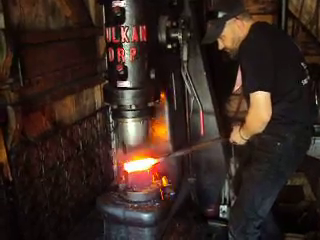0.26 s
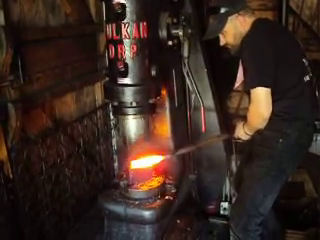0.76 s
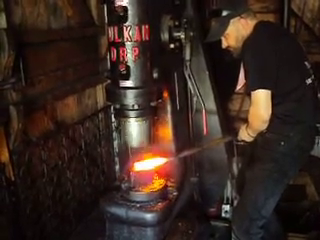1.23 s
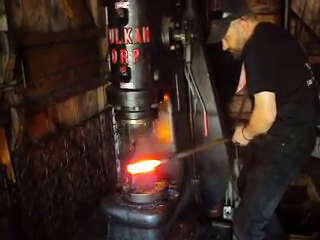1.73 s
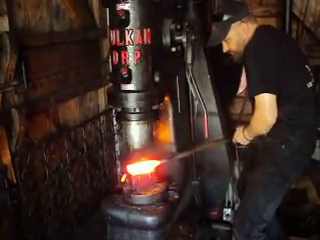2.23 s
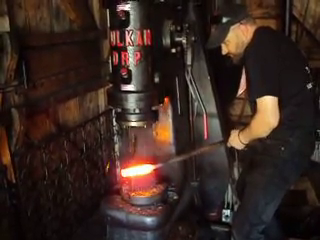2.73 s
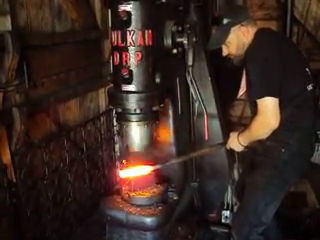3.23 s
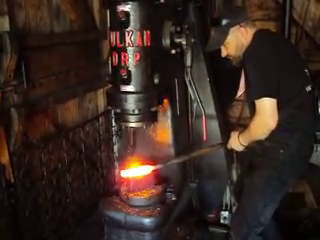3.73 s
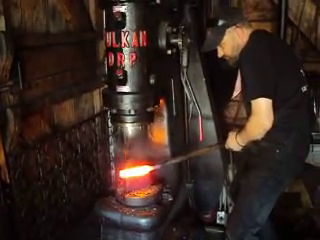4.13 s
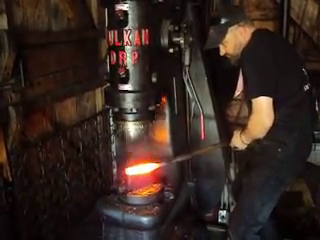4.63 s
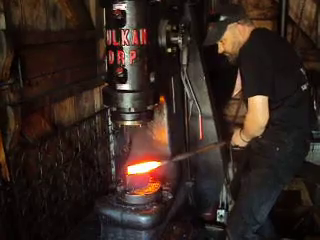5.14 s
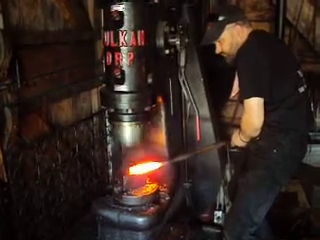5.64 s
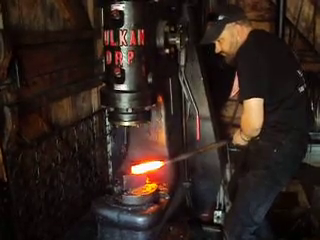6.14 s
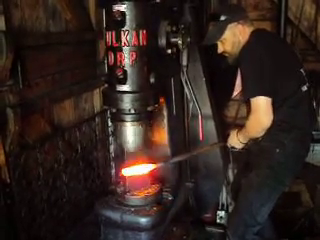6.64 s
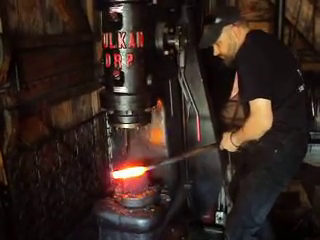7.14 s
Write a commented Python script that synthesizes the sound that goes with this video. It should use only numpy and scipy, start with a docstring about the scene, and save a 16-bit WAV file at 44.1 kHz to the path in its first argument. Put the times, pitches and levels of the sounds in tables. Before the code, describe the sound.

A pneumatic forging hammer pounds a hot steel bar about three times a second, without a break. Each blow cracks and clanks over a heavy thud, the machine's frame rings, and the bar and tongs rattle. Between blows, air rushes faintly and valves clack. A few sharp clicks come as the bar slaps the die. A motor hums underneath, the small workshop booms, and the hardest hits distort slightly.

```python
"""A motor hums in a small workshop while a pneumatic forging hammer pounds hot steel three times a second.
Each blow opens with a shove of air from the falling ram. The dies crack and clank, the ram knocks,
the anvil thuds and the frame rings. The room echoes and booms as tongs and bar rattle, then air rushes
in and the valves clack twice before the next blow. Now and then the bar slaps back onto the die.
The hardest blows saturate and clip."""
import sys
import numpy as np
from scipy import signal
from scipy.fft import rfft, irfft
from scipy.io import wavfile

SR = 44100
rng = np.random.default_rng(int(sys.argv[2]) if len(sys.argv) > 2 else 0)


def master_out(mix):
    """Clip the mix to full scale and print it as 16-bit PCM to the path in sys.argv[1]."""
    frames = np.transpose(np.atleast_2d(mix))
    ceiling = np.clip(frames, -1, 1)
    pcm = np.round(ceiling * 32767).astype(np.int16)
    wavfile.write(sys.argv[1], SR, pcm)


N = 325458


def amp(db):
    """Decibels to gain."""
    return 10 ** (np.asarray(db) / 20)


def unit(x):
    """Scales to rms 1."""
    return x / np.sqrt(np.mean(x ** 2) + 1e-20)


def curve_at(points, hz):
    """Reads a curve on a logarithmic frequency axis."""
    f, value = np.transpose(points)
    return np.interp(np.log(hz + 1), np.log(f + 1), value)


def add(mix, s, sound):
    """Mixes a sound in at s seconds."""
    start = round(s * SR)
    sound = sound[max(-start, 0):]
    part = mix[max(start, 0):][:len(sound)]
    part += sound[:len(part)]


def noise(eq, size=SR):
    """Noise of rms 1, coloured by an EQ curve."""
    hz = np.arange(size // 2 + 1) * SR / size
    return unit(irfft(rfft(rng.standard_normal(size)) * amp(curve_at(eq, hz)), size))


def ring(modes, t, scatter_db):
    """Sines that swell and die, each struck a little harder or softer every time."""
    hz, db, t60, attack_s = np.transpose(modes)[:, :, None]
    db = db + scatter_db * rng.standard_normal(db.shape)
    since_peak = t - attack_s
    rise = np.sin(np.pi / 2 * np.minimum(t / attack_s, 1)) ** 2
    fall = np.exp(-np.log(1000) * np.maximum(since_peak, 0) / t60)
    return (amp(db) * rise * fall * np.sin(2 * np.pi * hz * since_peak)).sum(0)


def blend(common, fresh, share):
    """Equal-power mix of what all blows have in common with what is new in this one."""
    return np.sqrt(share) * common + np.sqrt(1 - share) * fresh


# EQ of the machine's rumble: f/Hz, level/dB
RUMBLE_EQ = [(20, -21.5), (50, 10), (110, -6.5), (200, 7), (400, -9), (700, 2.5), (1300, -4.5),
             (2200, -21.5), (4000, -19), (5500, -42.5)]
# tones of the running machine: f/Hz, rms level/dB
HUM_TONES = [(100, -48), (194, -49.5), (538, -59.5), (684, -50.5), (2083, -63.5)]
def motor(rumble_db=-39, waver_cycles=0.52):
    """Motor and compressor lay a steady bed of rumble with a few wavering tones."""
    out, t = amp(rumble_db) * noise(RUMBLE_EQ, size=N), np.arange(N) / SR
    knots = np.linspace(0, t[-1], 60)
    for hz, db in HUM_TONES:
        drift = np.interp(t, knots, rng.standard_normal(len(knots)))
        out += np.sqrt(2) * amp(db) * np.sin(2 * np.pi * (hz * t + waver_cycles * drift))
    return out


# cue list of hammer blows: t/s, force/dB, hardness/dB, rattle level/dB
BLOWS = [(-.078, 0.5, -11, 10.5), (0.2578, -1, 0, 2), (0.5934, 1, -3, 5), (0.9322, 4.5, 0, 6),
         (1.2705, -0.5, 15, -12.5), (1.6124, 2.5, -8, 3), (1.9495, 0.5, 6, 0), (2.2900, 2.5, 6, 6.5),
         (2.6284, 1.5, 8, -1.5), (2.9682, 2, 3, 4), (3.3094, -1, 8.5, 5), (3.6486, -0.5, 7, 9.5),
         (3.9894, 2.5, 6.5, 10.5), (4.3059, 2, 17, 9), (4.6456, 1, 8.5, 9), (4.9925, -1.5, 8, 6.5),
         (5.336, -1.5, 4.5, 4), (5.6695, -1.5, 4, 2.5), (6.009, 0.5, -9, -6), (6.3504, -1, 5, 5),
         (6.6946, -2, -1.5, -20), (7.0345, -2, 1.5, -6.5), (7.366, -2.5, 2, -6)]
# EQ of moving air: f/Hz, level/dB
AIR_EQ = [(100, -1), (600, -9), (1300, 3), (2200, -0.5), (3400, -6.5), (4200, -9.5), (5200, -20.5),
          (6500, -29.5)]
def air_shove(push_db=-16, push_hz=100, puff_db=-37, lead_s=0.0105):
    """The falling ram shoves air and frame just before it lands."""
    out, t = np.zeros(N), np.arange(SR) / SR
    for s, force_db, *_ in BLOWS:
        shove = amp(puff_db) * noise(AIR_EQ) - amp(push_db) * np.sin(2 * np.pi * push_hz * t)
        add(out, s - lead_s, amp(force_db) * shove * np.exp(-t / 0.0015))
    return out


# EQ of the crack: f/Hz, level/dB
CRACK_EQ = [(40, -3.5), (120, 1.5), (250, 11), (350, -3.5), (700, 4), (1300, -1), (2000, -9), (2800, -8.5),
            (4200, -14.5), (5200, -22), (6500, -36.5)]
# clanking modes of the dies: f/Hz, level/dB, t60/s, attack/s
DIE_MODES = [(233, -22.5, 0.05, 0.0026), (470, -22, .06, 0.00502), (720, -17.5, 0.028, .003),
             (1554, -32, .09, 0.00062), (1940, -35, 0.075, 0.0011), (2050, -39, 0.28, 0.00087),
             (2150, -37, 0.2, 0.00091), (2430, -31.5, .08, 0.0013), (2560, -29, 0.036, .001),
             (2673, -28, 0.049, .001), (2780, -29.5, 0.061, .001), (2913, -32, 0.029, 0.0009),
             (3270, -45, 0.062, .001), (4050, -42, 0.18, .001)]
def dies(crack_db=-15, crack_s=0.012, clank_db=-2):
    """The dies strike with a crack and a clank, louder the harder the blow."""
    out, t = np.zeros(N), np.arange(SR) / SR
    common_crack = noise(CRACK_EQ)
    snap = (1 - np.exp(-t / 0.00027)) * np.exp(-t / crack_s)
    for s, _, hard_db, _ in BLOWS:
        crack = amp(crack_db) * snap * blend(common_crack, noise(CRACK_EQ), share=0.36)
        clank = amp(clank_db) * ring(DIE_MODES, t, scatter_db=1.5)
        add(out, s, amp(hard_db) * (crack + clank))
    return out


# slow level ride of the knock as the bar is shifted on the die: t/s, level/dB
KNOCK_RIDE = [(.3, -1), (1.3, 1), (3.3, -1), (3.7, -6.5), (4.8, -7.5), (5.35, -11.5), (5.9, -1), (7.3, 0)]
# modes of the ram: f/Hz, level/dB, t60/s, attack/s
RAM_MODES = [(240, -13, 0.2, 0.004), (445, -16, 0.17, .034), (459.4, -16, 0.28, 0.00786)]
def ram():
    """The ram's knock depends on where the bar lies under it; force and hardness add to it."""
    out, t = np.zeros(N), np.arange(SR) / SR
    for s, force_db, hard_db, _ in BLOWS:
        knock_db = np.interp(s, *np.transpose(KNOCK_RIDE)) + 0.4 * force_db + 0.24 * hard_db
        add(out, s, amp(knock_db) * ring(RAM_MODES, t, scatter_db=1.5))
    return out


# modes of anvil and frame: f/Hz, level/dB, t60/s, attack/s
FRAME_MODES = [(531, -27.5, 0.61, 0.032), (548, -24, 0.91, .03), (691, -16.7, .33, 0.011005),
               (679, -22.5, 0.38, 0.01115), (813, -25.5, 0.56, .032), (834, -18.3, .42, .032),
               (856, -23.5, .3, .032), (1034, -35, 0.25, .005), (1008, -37.5, 0.4, .005),
               (1170, -29, 0.42, .005), (1215, -27, 0.45, .005)]
def anvil(thud_db=-16, thud_hz=90):
    """The anvil block takes the ram's weight with a thud and rings with the frame."""
    out, t = np.zeros(N), np.arange(SR) / SR
    thud = -np.sin(2 * np.pi * thud_hz * t) * np.exp(-t / 0.008)
    for s, force_db, hard_db, _ in BLOWS:
        add(out, s, amp(thud_db + force_db + 0.25 * hard_db) * thud)
        add(out, s, amp(0.6 * force_db) * ring(FRAME_MODES, t, scatter_db=1.1))
    return out


# EQ of the wall reflections: f/Hz, level/dB
REVERB_EQ = [(30, -23.5), (60, -6.5), (200, -5), (380, -2.5), (550, -2), (850, -3), (1250, -5.5),
             (1900, -13), (2900, -16.5), (4000, -25.5), (5200, -31), (6500, -53.5)]
# their decay time: f/Hz, t60/s
REVERB_T60 = [(60, 0.54), (250, 0.9), (600, 0.91), (1200, 0.6), (2500, 0.54), (5500, 0.63)]
def reverb_tail():
    """One second of dense reflections; the low mids hang on longest."""
    hz, t, spectrum = signal.stft(noise(REVERB_EQ), SR, nperseg=512)
    decay = np.exp(-np.log(1000) * t / curve_at(REVERB_T60, hz)[:, None])
    return signal.istft(spectrum * decay, SR, nperseg=512)[1][:SR]


# standing waves of the workshop: f/Hz, level/dB, t60/s, attack/s
ROOM_MODES = [(49.2, -38.5, 0.58, .02), (60.5, -36, 0.8, 0.016), (84, -37.5, 0.23, 0.0053),
              (97.5, -43, 0.2, 0.0026), (131, -26.5, 0.32, .0267), (162.2, -24, .6, 0.0509),
              (170.7, -22, 0.34, 0.0474), (197.1, -15.2, 0.47, .0406), (216.6, -19, 0.25, 0.051),
              (273.4, -34.5, 0.56, 0.0075), (293, -36, 0.19, 0.024), (349.7, -36, 0.69, .07)]
def room(reverb_db=-15, echo_db=-4, echo_s=0.0722):
    """The ram always lands on one spot, so blows share reflections; the boom swells twice."""
    out, t = np.zeros(N), np.arange(SR) / SR
    common_tail = reverb_tail()
    for s, force_db, *_ in BLOWS:
        tail = blend(common_tail, reverb_tail(), share=0.51) * (1 - np.exp(-t / 0.00072))
        boom = amp(force_db) * ring(ROOM_MODES, t, scatter_db=1.8)
        add(out, s, amp(force_db + reverb_db) * tail + boom)
        add(out, s + echo_s, amp(echo_db) * boom)  # thrown back from the far end
    return out


# EQ of the loose steel: f/Hz, level/dB
RATTLE_EQ = [(40, -6), (200, -1), (350, -0.5), (600, 7), (1000, 1.5), (1800, -8.5), (3000, -15),
             (5000, -25.5), (6500, -51)]
def rattle(level_db=-24, knocks_per_s=400, knock_s=0.0032, hold_s=0.053, fade_s=0.069):
    """Bar, tongs and loose parts chatter after a blow that does not land flat."""
    out, t = np.zeros(N), np.arange(SR) / SR
    for s, force_db, _, loose_db in BLOWS:
        fade_start_s = hold_s * 2 ** (force_db / 3)  # 3 dB more force doubles the hold
        envelope = (1 - np.exp(-t / 0.011)) * np.exp(-np.maximum(t - fade_start_s, 0) / fade_s)
        knocks = (rng.random(SR) < knocks_per_s / SR) * rng.random(SR)
        knock_power = signal.lfilter([1], [1, -np.exp(-1 / (knock_s * SR))], knocks)
        chatter = unit(np.sqrt(0.13 + knock_power))
        add(out, s, amp(level_db + loose_db) * envelope * chatter * noise(RATTLE_EQ))
    return out


def valves(rush_db=-39.5, rush_after_s=0.24, clack_db=-37, clacks_after_s=(0.272, 0.296)):
    """On the return stroke, air rushes through the ports and the valves clack twice."""
    out, t = np.zeros(N), np.arange(SR // 4) / SR
    rush_envelope = (1 - np.exp(-t / 0.03)) * np.exp(-t / 0.081)
    clack_envelope = (1 - np.exp(-t / 0.0056)) * np.exp(-t / 0.016)
    for s, force_db, *_ in BLOWS:
        draw_db = 1.8 * force_db  # a heavy stroke moves more air
        rush = rush_envelope * noise(AIR_EQ, size=len(t))
        add(out, s + rush_after_s, amp(rush_db + draw_db) * rush)
        for after_s in clacks_after_s:
            jitter_s, accent_db = rng.normal(0, (0.007, 1.2))
            clack = clack_envelope * noise(AIR_EQ, size=len(t))
            add(out, s + after_s + jitter_s, amp(clack_db + 0.5 * draw_db + accent_db) * clack)
    return out


# cue list of the bar's slaps: t/s, level/dB
BAR_SLAPS = [(.955, 5.5), (2.657, 2.5), (3.321, 3), (4.111, 8)]
def bar_slaps(tone_hz=620, decay_s=0.00094):
    """The bar slaps back onto the die with a sharp click."""
    out, t = np.zeros(N), np.arange(SR) / SR
    for s, db in BAR_SLAPS:
        slap = np.sin(2 * np.pi * tone_hz * t) + 0.4 * noise(CRACK_EQ)
        add(out, s, amp(db) * np.exp(-t / decay_s) * slap)
    return out


def scene():
    """The whole workshop, mixed to mono."""
    return (motor() + air_shove() + dies() + ram() + anvil() + room()
            + rattle() + valves() + bar_slaps())[None]


def record(dry, threshold_db=-15, squeeze=0.15, release_db_per_s=150, attack_s=0.02):
    """Gentle compression leans on each blow; the mix is saturated, darkened and clipped at its peaks."""
    pole = np.exp(-1 / (attack_s * SR))
    power_db = 10 * np.log10(signal.lfilter([1 - pole], [1, -pole], dry[0] ** 2) + 1e-12)
    release_db = np.arange(N) * release_db_per_s / SR
    held_db = np.maximum.accumulate(power_db + release_db) - release_db
    compressed = dry[0] * amp(-squeeze * np.maximum(held_db - threshold_db, 0))
    saturated = 0.82 * np.tanh(compressed / 0.82)
    dark_lowpass = signal.firwin(201, 5800, window=("kaiser", 8), fs=SR)
    clipped = np.clip(signal.oaconvolve(saturated, dark_lowpass, "same"), -0.71, 0.71)
    top_lowpass = signal.firwin(255, 16500, window=("kaiser", 9), fs=SR)
    return signal.oaconvolve(clipped, top_lowpass, "same")[None]


dry = scene()
out = record(dry)
master_out(out)
```